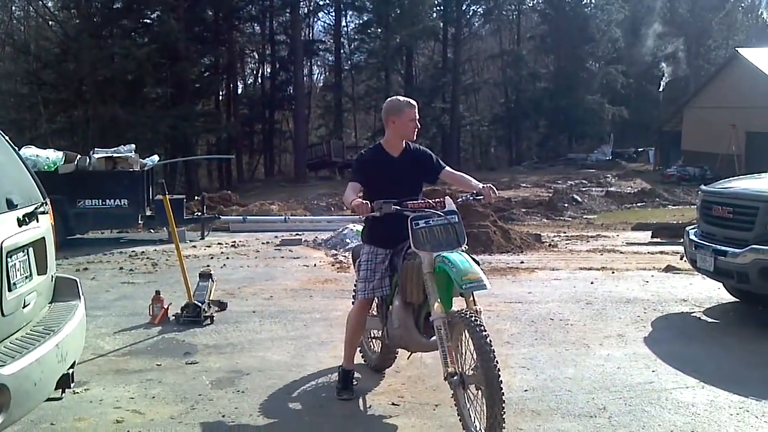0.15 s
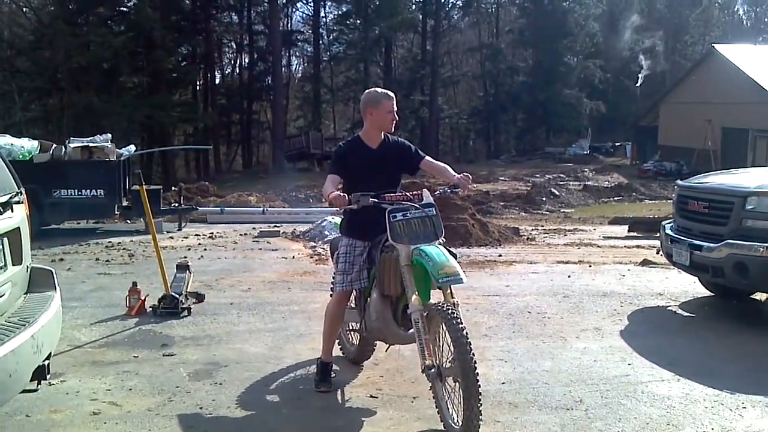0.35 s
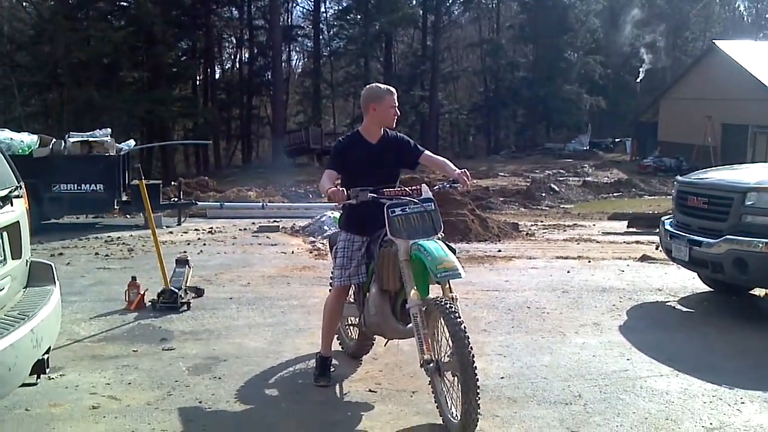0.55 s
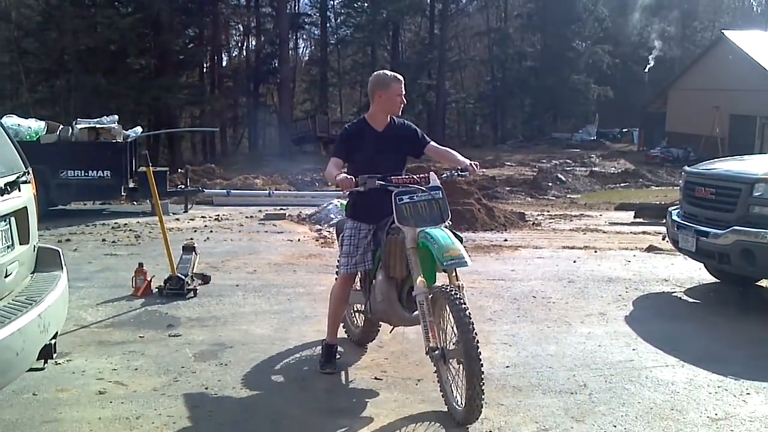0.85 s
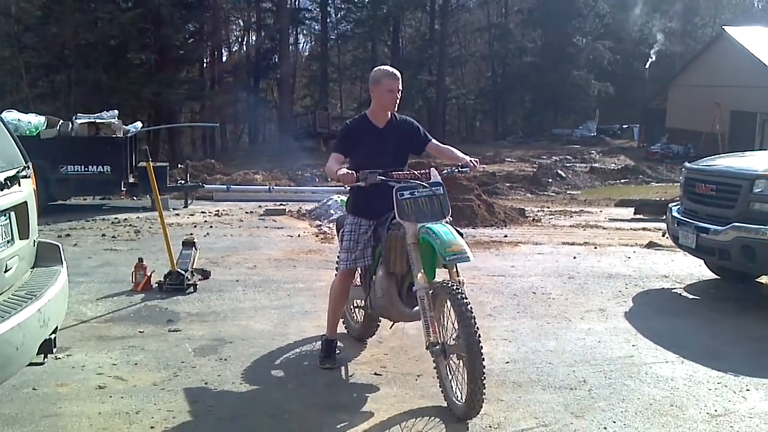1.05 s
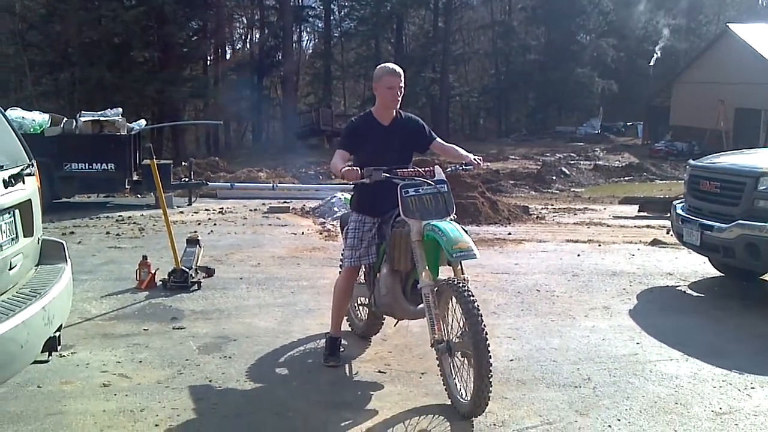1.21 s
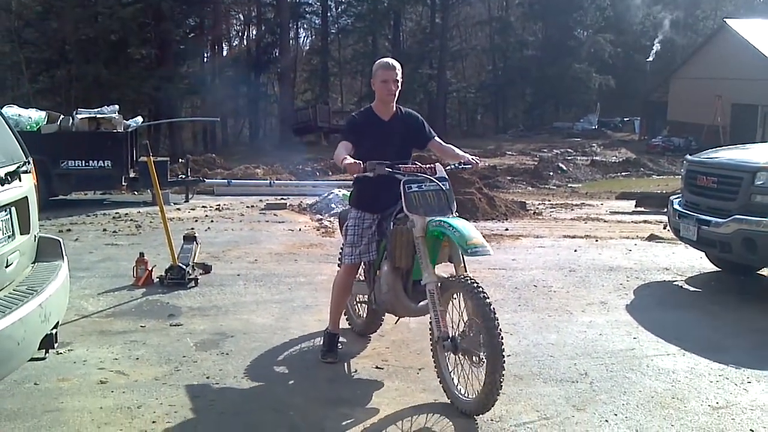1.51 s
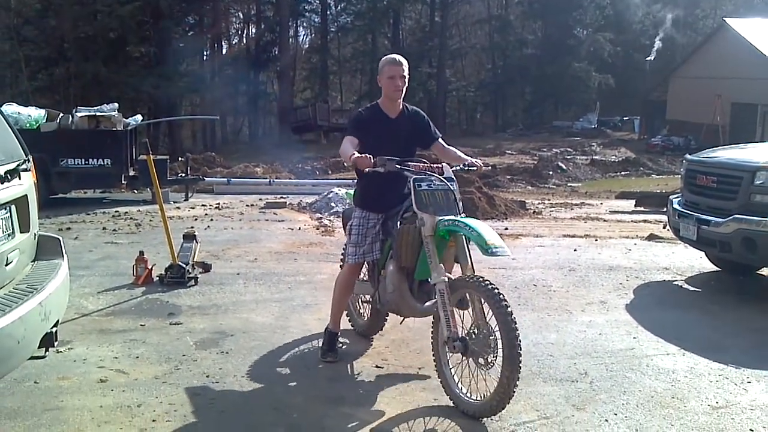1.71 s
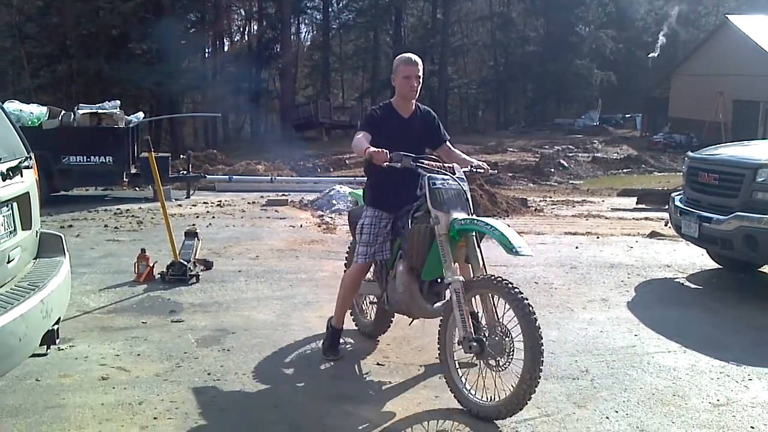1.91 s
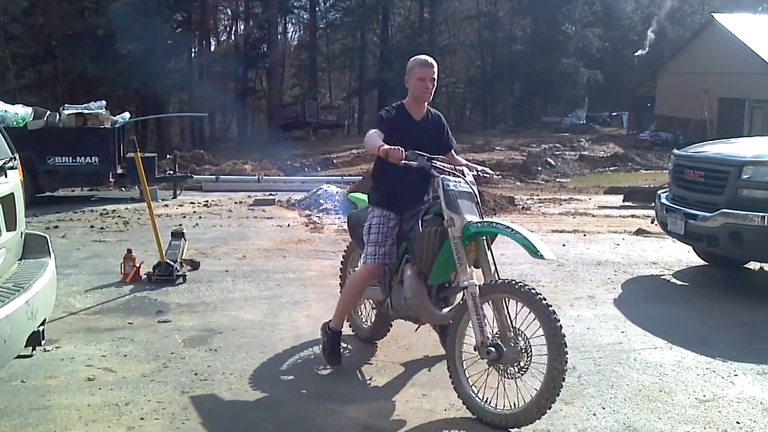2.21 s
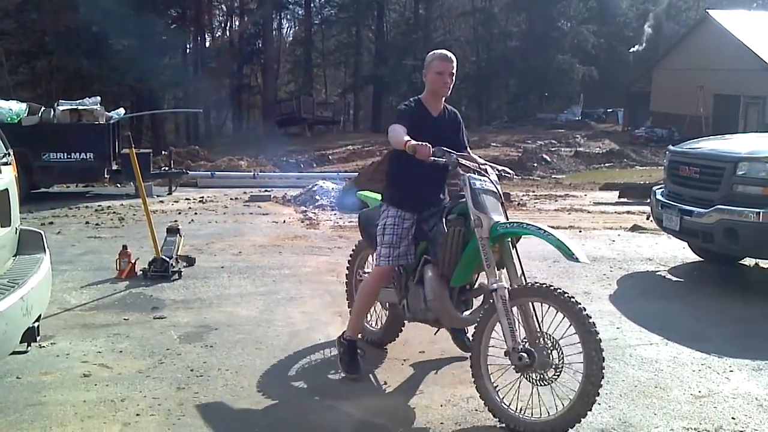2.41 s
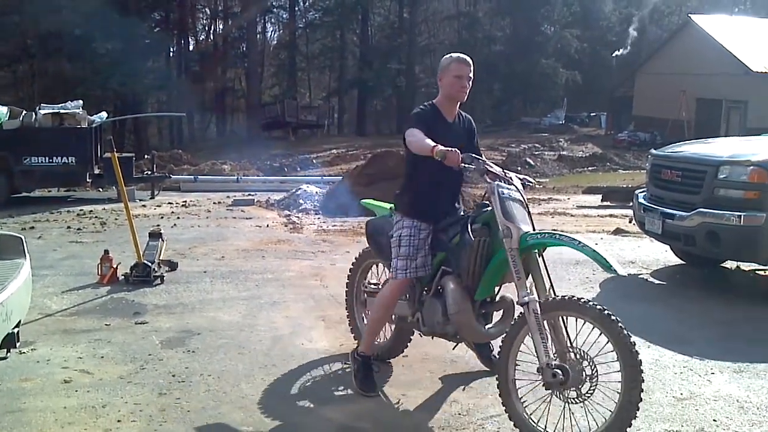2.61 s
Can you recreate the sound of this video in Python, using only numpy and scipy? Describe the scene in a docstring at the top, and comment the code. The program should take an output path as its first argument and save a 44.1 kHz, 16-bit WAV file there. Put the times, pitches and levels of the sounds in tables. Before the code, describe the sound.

Close by in a yard, a dirt bike's two-stroke engine clunks into gear and sputters irregularly, then fires faster with a quick blip and a rasping pull-away. Its loudest pops distort a little, with a soft wash from the trees.

```python
"""A yard with trees: a two-stroke dirt bike idles, clunks into gear, gets a blip and pulls away.
The cylinder often skips turns. Each firing cracks, barks and booms in the pipe, the piston clatters
on every turn, and rushing gas sings in the silencer on the throttle. Behind it the trees give back
a wash of sound. The microphone overloads on the cracks; its two ports hear the bass in opposite phase."""
import sys
import numpy as np
from scipy import signal
from scipy.fft import rfft, irfft
from scipy.io import wavfile
from scipy.ndimage import uniform_filter1d

SR = 44100
rng = np.random.default_rng(int(sys.argv[2]) if len(sys.argv) > 2 else 0)


def digitize_waveform(pressure):
    """Quantize a signal to 16-bit integers and store it at the path in sys.argv[1].

    Rows of a 2-D input are taken as channels; values are limited to [-1, 1].
    """
    field = np.atleast_2d(pressure).T
    bounded = np.clip(field, -1, 1)
    quanta = np.round(bounded * 32767).astype(np.int16)
    wavfile.write(sys.argv[1], SR, quanta)


N = 121275
TIME_S = np.arange(N) / SR
BINS_HZ = np.arange(N // 2 + 1) * SR / N

# The engine's rhythm: start_s, crack_db, bark_db, boom_db, turns_to_next_firing
FIRINGS = [(.002, -27, -16, -1, 9), (0.2437, -0.5, -3.5, 0, 5), (.388, -8.5, -14, -8, 2),
           (.448, -4, -11.5, -0.5, 2), (.505, -28, -16.5, -5, 2), (.565, -20, -20, -12, 7),
           (.779, -23, -24, -7, 2), (0.8447, 4, -3.5, 2, 7), (1.053, 3.5, -3.5, 4.5, 3),
           (1.1295, -3, -3, 3, 5), (1.255, -5.5, -3, 5, 1), (1.281, -18, -17, 1.5, 1),
           (1.3065, -10, -7, 1, 2), (1.355, -2, -2.5, 4.5, 5), (1.476, 1.5, 2.5, 9.5, 1),
           (1.498, 4, -2.5, 9, 1), (1.515, -1.5, 2, 6, 1), (1.532, 3.5, 2, 0, 3), (1.577, -17, -7.5, -9, 1),
           (1.591, -15, -11, -13, 8), (1.7358, -20, -17, -10, 2), (1.778, -8, -9, -0.5, 3),
           (1.845, 4.5, 0.5, 4.5, 1), (1.864, -1, -7.5, 2.5, 2), (1.903, 4, 2.5, 5, 2),
           (1.937, -11, -14, 0, 1), (1.9544, 3.5, 2.5, 0, 4), (2.022, -6, -4.5, -3, 2),
           (2.058, -1, 2, 7, 3), (2.110, 0, 3, 1, 1), (2.126, -2, 1.5, 2, 2), (2.158, 0, 3, 1, 1),
           (2.172, -3, 0.5, -5, 3), (2.214, -2, 3.5, -2, 3), (2.2562, 3.5, 4.5, -6, 3),
           (2.299, -4, 4.5, -11, 3), (2.343, -1, 4, 3, 3), (2.392, -0.5, 4, 4, 2), (2.426, 2.5, 1, -4, 1),
           (2.446, 1.5, -3, -1, 3), (2.495, 5, 4, 4, 3), (2.552, 3, 3, 4, 4), (2.630, 4, 2, -0.5, 5),
           (2.748, -3.5, -3, 3, 1)]
# How hard the engine works: time_s, effort_db
EFFORT_CURVE = [(0, -8.5), (.3, -10.5), (.8, -11), (1.03, -11), (1.15, -8.5), (1.45, -9.5), (1.53, -5.5),
                (1.6, -3), (1.7, -6.5), (1.82, -7), (1.92, -4), (2.08, -4), (2.17, -0.5), (2.32, 1.5),
                (2.45, -2.5), (2.58, -3), (2.66, -5.5), (2.75, -8)]
# The gear going in: start_s, level_db
GEAR_HITS = [(.048, -5), (0.096, 0.5)]
# The gears' clink: pitch_hz, relative_db, uncapped_t60_s
CLINK_MODES = [(1620, -9, 0.087), (2369, -12, 0.1), (2560, -12, 0.08), (3180, -10, 0.076),
               (4240, -3, 0.026), (4861, -6, 0.05), (5450, -3, 0.032)]
# Cylinder and case resonances: pitch_hz, width_hz, level_db
CASE_PEAKS = [(852, 36, -37.5), (1470, 56, -40.5), (1825, 130, -35), (2480, 110, -38.5), (2840, 140, -37.5),
              (3280, 90, -42.5), (4780, 650, -36)]
# The cylinder ringing on between turns: pitch_hz, level_db, t60_s
CYLINDER_MODES = [(1803, -33.5, .1), (1893, -31, .09)]
# The exhaust pipe's body: cool_pitch_hz, fired_db, unfired_db, t60_s
PIPE_MODES = [(104.7, -26.5, -33, 0.087), (161, -25, -30.5, 0.059), (218, -21.5, -29, .14),
              (247.6, -23, -23.5, 0.083), (331.7, -27.5, -26, 0.1), (436, -33, -56, 0.3),
              (670, -32, -33, 0.12), (756, -43, -47, 0.044), (878, -38, -36, 0.21)]
# Silencer tones in the blip and the pull-away: start_s, end_s, pitch_hz, width_hz, level_db
SILENCER_TONES = [(1.51, 1.56, 1090, 130, -27), (1.55, 1.65, 630, 22, -34), (2.12, 2.42, 260, 30, -31),
                  (2.2, 2.47, 607, 12, -30), (2.18, 2.56, 822, 16, -30), (2.13, 2.43, 957, 13, -29.5),
                  (2.18, 2.4, 1383, 44, -36)]
# Tone colour of each noise layer: frequency_hz, relative_density_db
WASH_COLOUR = [(50, -86), (100, -71), (160, -54), (240, -45), (340, -52.5), (420, -51), (520, -56.5),
               (640, -48.5), (850, -52), (1130, -52), (1400, -54.5), (3000, -54), (5500, -56), (8000, -63),
               (12000, -65.5), (15500, -72.5)]
CLUNK_COLOUR = [(400, -64), (1000, -63), (1600, -48.5), (2400, -52.5), (3500, -47), (5500, -54.5),
                (8000, -66), (15000, -69)]
CLATTER_COLOUR = [(500, -65.5), (1150, -67.5), (2000, -59), (3200, -66), (5000, -67.5), (7000, -68),
                  (9500, -77.5), (15500, -69)]
BARK_COLOUR = [(40, -86), (110, -60), (250, -44), (500, -54.5), (900, -50), (1130, -52.5), (1500, -54.5),
               (3000, -53.5), (5500, -54), (7500, -54.5), (12000, -55.5), (15500, -64.5)]
CRACK_COLOUR = [(500, -84), (2000, -52), (4500, -57), (7500, -51.5), (10000, -47), (12000, -39.5),
                (15500, -42.5)]
# The right port's level against the left: frequency_hz, gain_db
RIGHT_TONE = [(100, -2.5), (300, -2.5), (700, -5), (1400, -6.5), (2800, -11.5), (5600, -15), (9000, -12.5),
              (14000, -19)]
# How alike the ports sound: frequency_hz, likeness_0_to_1
PORT_LIKENESS = [(100, 0.98), (300, 0.99), (700, 0.81), (1400, 0.8), (3000, 0.25), (6000, 0.12),
                 (14000, 0.25)]
# The right port's phase behind the left: frequency_hz, lag_rad
RIGHT_PHASE = [(100, 2.985), (400, 3.5), (700, 3.81), (1000, 4.22), (1400, 4.5), (2500, 4.82), (4500, 5.05),
               (8000, 8), (12000, 13.2)]


def from_db(db):
    """Decibels to gain."""
    return 10 ** (np.asarray(db) / 20)


def over_hz(points):
    """A table spread over all frequencies, straight on a log axis."""
    hz, value = np.transpose(points)
    return np.interp(np.log(BINS_HZ + 1), np.log(hz), value)


def effort_db(time_s):
    """Engine effort at the given times."""
    return np.interp(time_s, *np.transpose(EFFORT_CURVE))


def low_cut(sound, hz, order=2):
    """Roll off the bass."""
    return signal.sosfilt(signal.butter(order, hz, "high", fs=SR, output="sos"), sound)


def noise(gain):
    """Two unrelated noises with the given amplitude per root Hz."""
    return irfft(rfft(rng.standard_normal((2, N))) * gain, N) * np.sqrt(SR / 2)


def resonances(peaks):
    """Amplitude per root Hz of a set of peaks."""
    return np.sqrt(sum(from_db(db) ** 2 / width / (1 + ((BINS_HZ - hz) / width) ** 2) ** 2
                       for hz, width, db in peaks))


def silencer_noise(colour, round_trip_s=.00219, feedback=.14):
    """Noise with an even ripple of peaks from sound bouncing along the silencer."""
    loop = feedback * np.exp(-2j * np.pi * BINS_HZ * round_trip_s)
    return noise(from_db(over_hz(colour)) / (1 - loop))


def bursts(times_s, db, rise_s, hold_s, fall_s):
    """Envelope of overlapping bursts that swell, hold and die away."""
    power = np.zeros(N)
    for start, gain, held in zip(times_s, from_db(db), hold_s * np.ones(len(times_s))):
        near = slice(max(0, int((start - .02) * SR)), int((start + .2) * SR))
        age = TIME_S[near] - start
        shape = np.exp(np.minimum(age, 0) / rise_s - np.maximum(age - held, 0) / fall_s)
        power[near] += (gain * shape) ** 2
    return np.sqrt(power)


def ring(times_s, db, hz, t60_s):
    """Strikes set one mode ringing; its pitch may move."""
    strikes = np.zeros(N)
    strikes[(times_s * SR).astype(int).clip(0, N - 1)] = from_db(db)
    carrier = np.exp(2j * np.pi * np.cumsum(hz * np.ones(N)) / SR)
    decay = np.exp(-np.log(1000) / (t60_s * SR))
    return (carrier * signal.lfilter([1], [1, -decay], strikes / carrier + 1e-18)).imag


def coasting_turns(sag=0.0698):
    """Times of the unfired turns: the crank slows a little until the next firing."""
    times_s = []
    for (start, *_, turns), (end, *_) in zip(FIRINGS, FIRINGS[1:]):
        part = np.arange(1, turns) / turns
        times_s.extend(start + (end - start) * (part - sag * part * (1 - part)))
    return np.array(times_s)


def yard_wash():
    """The bed: engine sound scattered by trees and vehicles, swelling with the effort."""
    return silencer_noise(WASH_COLOUR) * from_db(effort_db(TIME_S))


def gearbox(clink_db=-19, longest_t60_s=.09):
    """Two metallic clunks as the gear goes in, each with a short clink."""
    start_s, db = np.transpose(GEAR_HITS)
    knocks = bursts(start_s, db, rise_s=.0021, hold_s=.0028, fall_s=.016)
    out = knocks * noise(from_db(over_hz(CLUNK_COLOUR)))
    for k, (hz, mode_db, t60_s) in enumerate(CLINK_MODES):
        out[0] += (-1) ** k * ring(start_s, db + clink_db + mode_db, hz, min(t60_s, longest_t60_s))
    return out


def silencer_song(rise_s=.03, fall_s=.05):
    """Rushing gas keeps a few breathy tones ringing while the throttle is open."""
    out = np.zeros((2, N))
    for start, end, hz, width, db in SILENCER_TONES:
        swell = np.exp(np.minimum(TIME_S - start, 0) / rise_s - np.maximum(TIME_S - end, 0) / fall_s)
        out += swell * noise(resonances([(hz, width, db)]))
    return out


def piston_clatter(coasting_s, lead_s=.0042, effort_share=.16, spread_db=.5, ring_spread_db=.8):
    """On every turn the piston rattles the cases and leaves the cylinder ringing."""
    turns_s = np.r_[np.transpose(FIRINGS)[0], coasting_s] - lead_s
    effort = effort_db(turns_s)
    rattle_db = effort_share * (effort - effort.min()) + spread_db * rng.standard_normal(len(turns_s))
    metal = noise(np.hypot(resonances(CASE_PEAKS), from_db(over_hz(CLATTER_COLOUR))))
    out = metal * bursts(turns_s, rattle_db, rise_s=.0041, hold_s=.0026, fall_s=.0056)
    for hz, mode_db, t60_s in CYLINDER_MODES:
        out[0] += ring(turns_s, mode_db + ring_spread_db * rng.standard_normal(len(turns_s)), hz, t60_s)
    return out


def zips(from_hz=1925, to_hz=5743, glide_s=.0025, lead_s=.0038, length_s=.0093, pitch_spread=.0634):
    """A short metallic ping sweeps upwards into each crack."""
    out = np.zeros((2, N))
    for start, crack_db, *_ in FIRINGS:
        age = TIME_S - start + lead_s
        near = (age > 0) & (age < length_s)
        detune = 1 + pitch_spread * rng.standard_normal()
        hz = detune * (to_hz + (from_hz - to_hz) * np.exp(-age[near] / glide_s))
        gain = from_db(-17.5 + .22 * crack_db)  # a harder crack brings a slightly louder ping
        swell = np.sin(np.pi * age[near] / length_s)
        out[0, near] += gain * swell * np.sin(2 * np.pi * np.cumsum(hz) / SR)
    return out


def pipe_boom(coasting_s, lag_s=.00707, spread_db=2.0):
    """Firings and the puffs of unfired turns ring the exhaust pipe's modes."""
    fired_s, _, _, boom_db, _ = np.transpose(FIRINGS)
    pulses_s = np.r_[fired_s, coasting_s] + lag_s
    heat_stretch = np.interp(TIME_S, [1.88, 2.22], [1, 1.086])  # hot gas lifts the pitch on pull-away
    boom = np.zeros(N)
    for k, (hz, fired_db, unfired_db, t60_s) in enumerate(PIPE_MODES):
        db = np.r_[boom_db + fired_db, np.full(len(coasting_s), unfired_db)]
        db += spread_db * rng.standard_normal(len(db))
        boom += (-1) ** k * ring(pulses_s, db, hz * heat_stretch, t60_s)
    return np.array([low_cut(boom, hz=92, order=3), np.zeros(N)])  # the boom carries little deep bass


def gas_sputter(depth_db=2.5, grain_s=.0006):
    """The fine grit of the gas: a fast random gain of unit power."""
    flutter = uniform_filter1d(rng.standard_normal(N), int(grain_s * SR))
    gain = from_db(depth_db * flutter / flutter.std())
    return gain / np.sqrt(np.mean(gain ** 2))


def exhaust_pops(crack_rise_s=.00077, crack_hold_s=.0029, bark_rise_s=.0017, bark_hold_s=.0049):
    """Each firing is a broad bark and, just after it, a bright crack that lengthens under load."""
    fired_s, crack_db, bark_db, _, _ = np.transpose(FIRINGS)
    load_stretch = np.exp(.23 * effort_db(fired_s))
    crack = bursts(fired_s, crack_db, crack_rise_s, crack_hold_s * load_stretch, fall_s=.0021)
    bark = bursts(fired_s - .00056, bark_db, bark_rise_s, bark_hold_s, fall_s=.017)
    # The crack reflects off ground and vehicles; the bark trails longer among the trees.
    crack_tail = bursts(fired_s, crack_db - 22, crack_rise_s, crack_hold_s, fall_s=.033)
    bark_tail = bursts(fired_s, bark_db - 13.5, bark_rise_s, bark_hold_s, fall_s=.052)
    grit = gas_sputter()
    cracks = np.hypot(crack, crack_tail) * noise(from_db(over_hz(CRACK_COLOUR)))
    barks = np.hypot(bark, bark_tail) * silencer_noise(BARK_COLOUR)
    return low_cut(grit * (cracks + barks), hz=150)


def microphone_ports(sound):
    """The right port hears a duller, phase-turned copy of the left, less alike towards the treble."""
    left, unrelated = rfft(sound)
    alike = over_hz(PORT_LIKENESS)
    right = alike * left * np.exp(-1j * over_hz(RIGHT_PHASE)) + np.sqrt(1 - alike ** 2) * unrelated
    return np.array([sound[0], irfft(right * from_db(over_hz(RIGHT_TONE)), N)])


def scene():
    """The bike and the yard at the microphone."""
    coasting_s = coasting_turns()
    engine = exhaust_pops() + zips() + pipe_boom(coasting_s) + piston_clatter(coasting_s)
    return microphone_ports(engine + silencer_song() + gearbox() + yard_wash())


def record(dry):
    """The cracks overload the input; the deep bass and the top are cut."""
    overloaded = np.clip(dry, -.95, .95)
    top_cut = signal.ellip(12, .1, 70, 15900, fs=SR, output="sos")
    return signal.sosfilt(top_cut, low_cut(overloaded, hz=52))


dry = scene()
out = record(dry)
digitize_waveform(out)
```